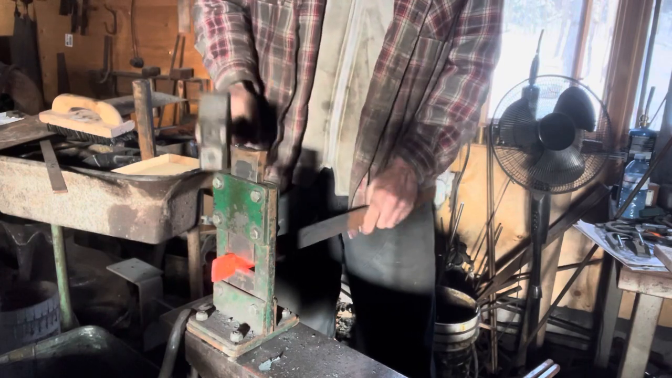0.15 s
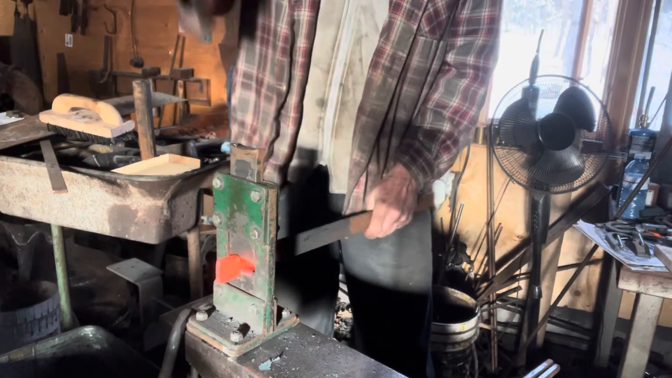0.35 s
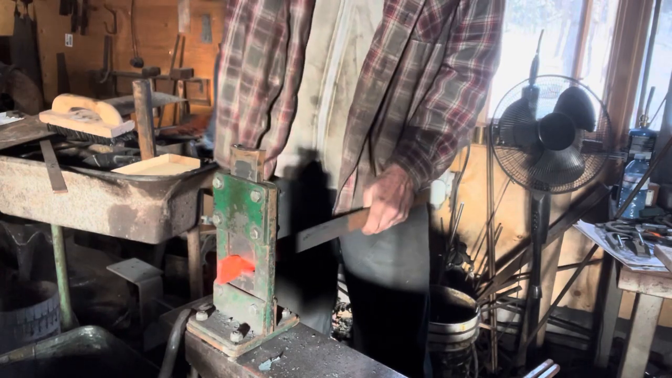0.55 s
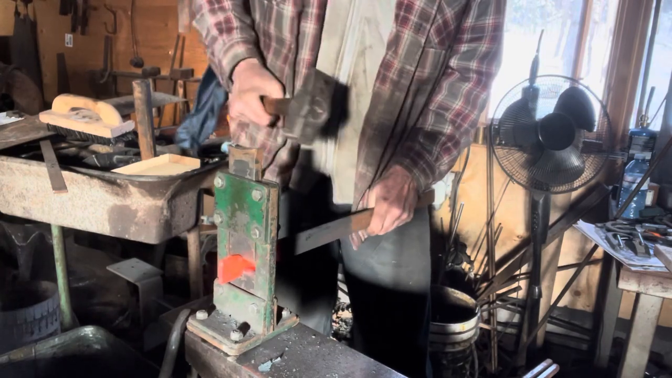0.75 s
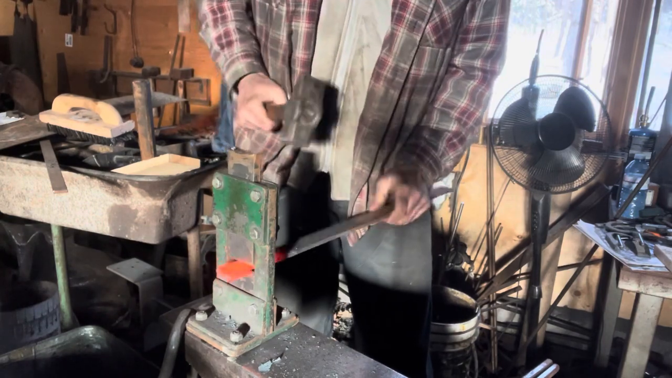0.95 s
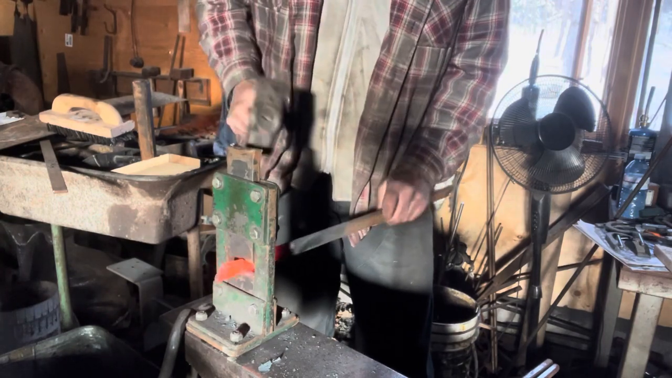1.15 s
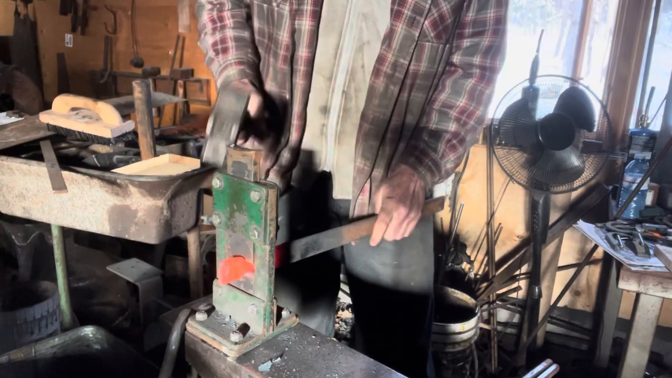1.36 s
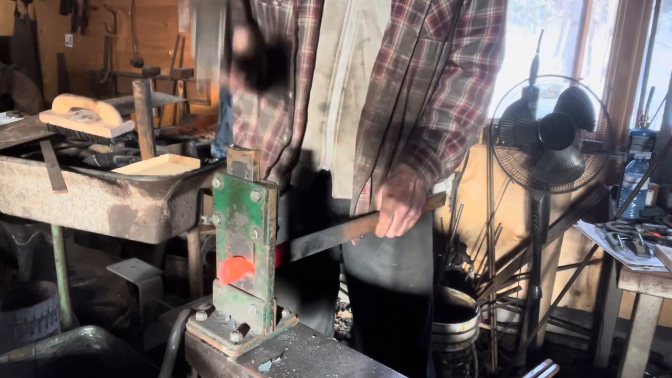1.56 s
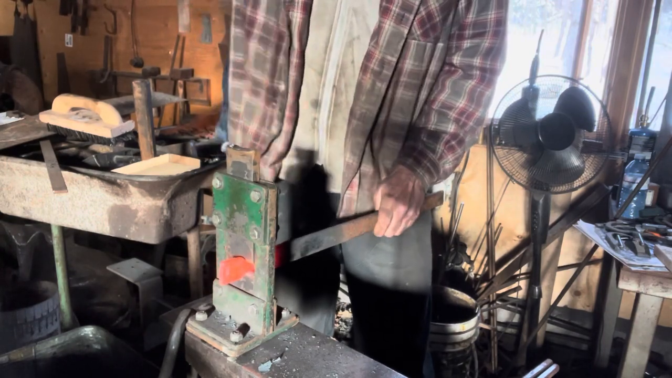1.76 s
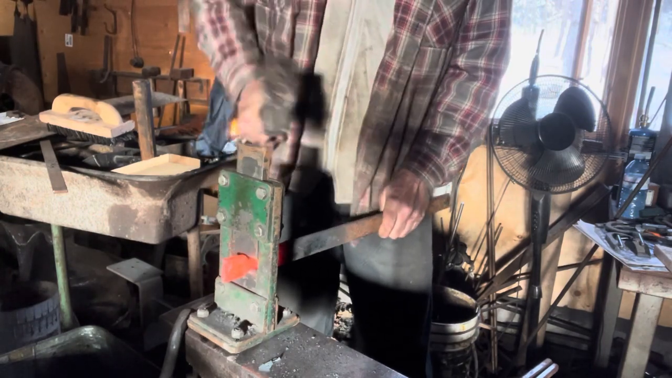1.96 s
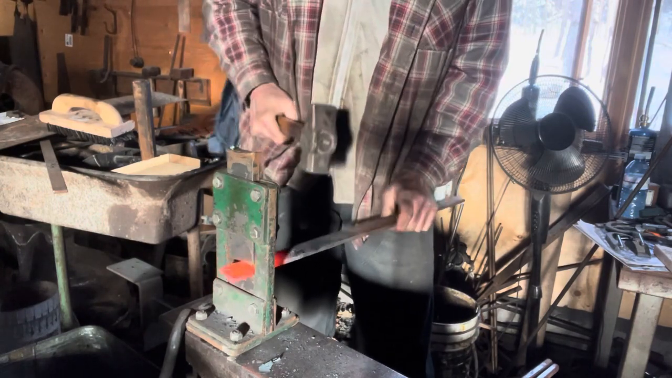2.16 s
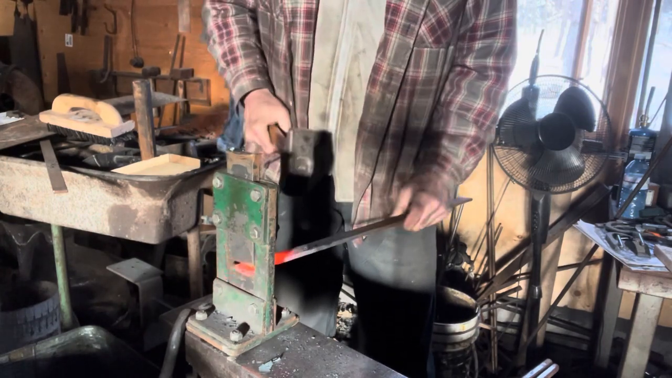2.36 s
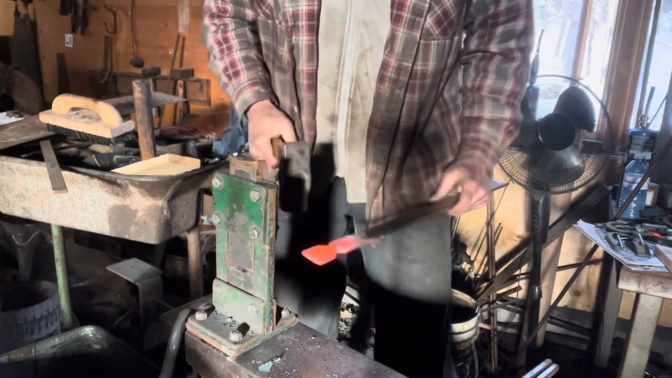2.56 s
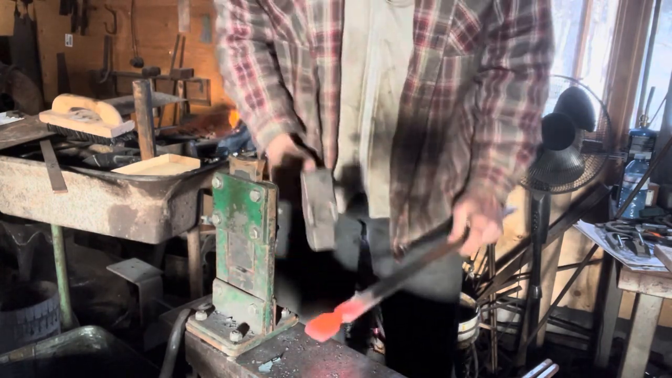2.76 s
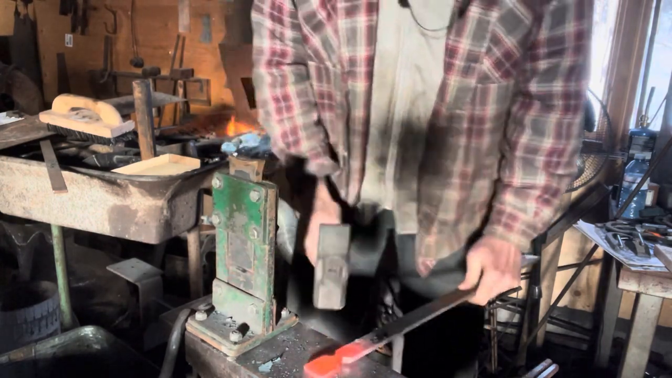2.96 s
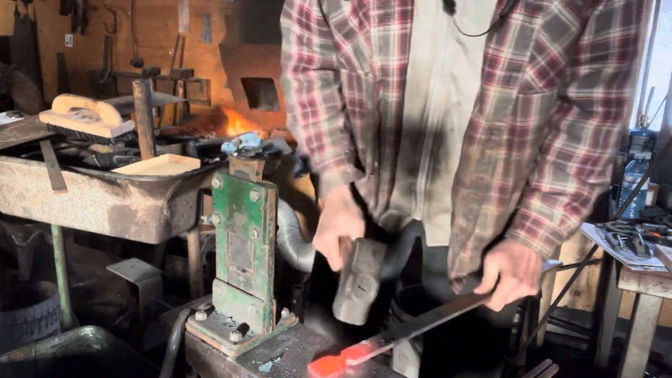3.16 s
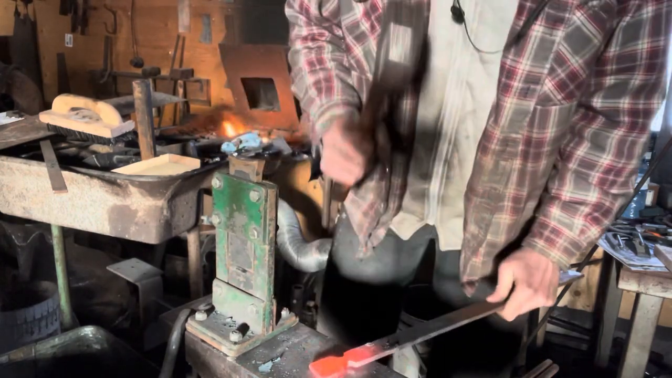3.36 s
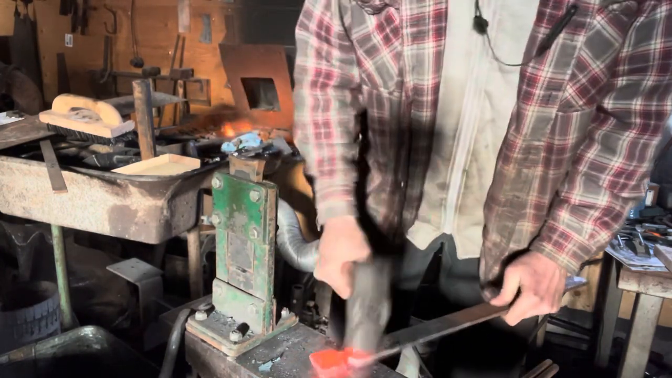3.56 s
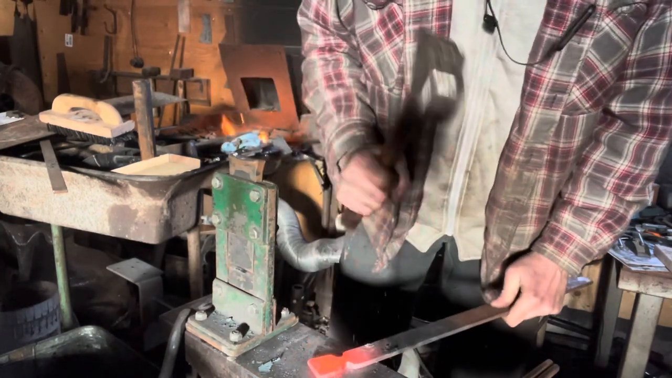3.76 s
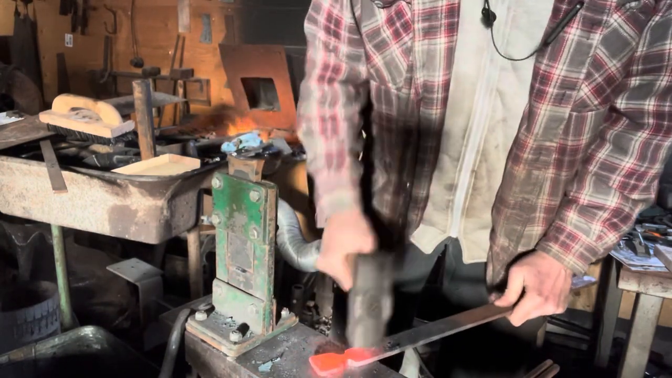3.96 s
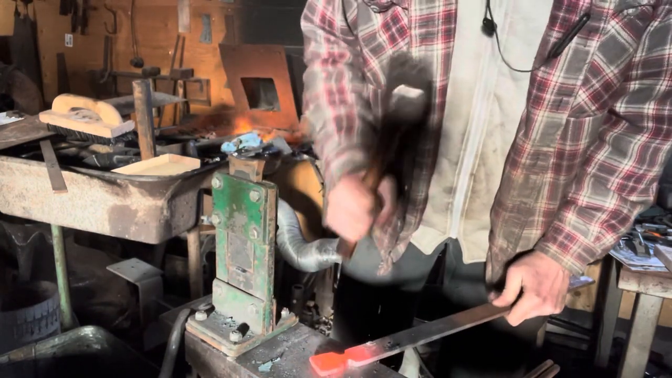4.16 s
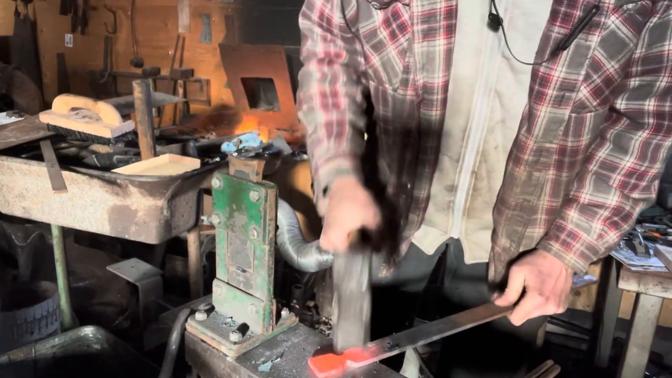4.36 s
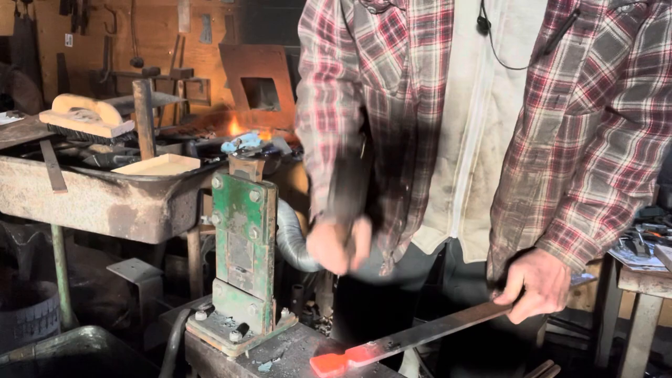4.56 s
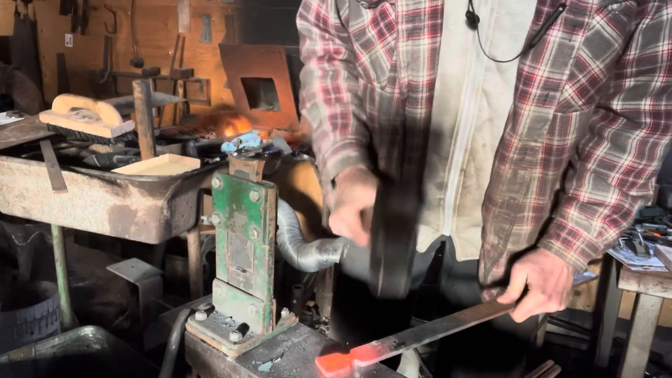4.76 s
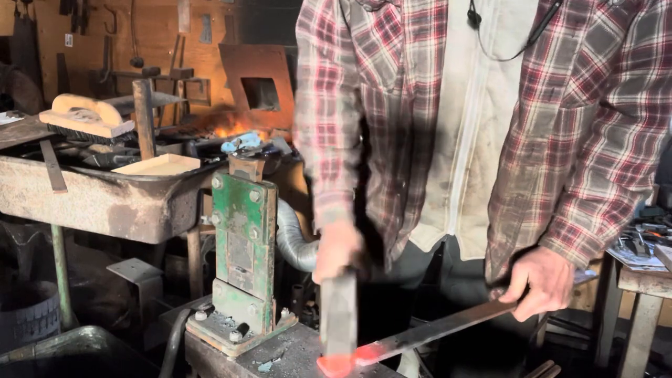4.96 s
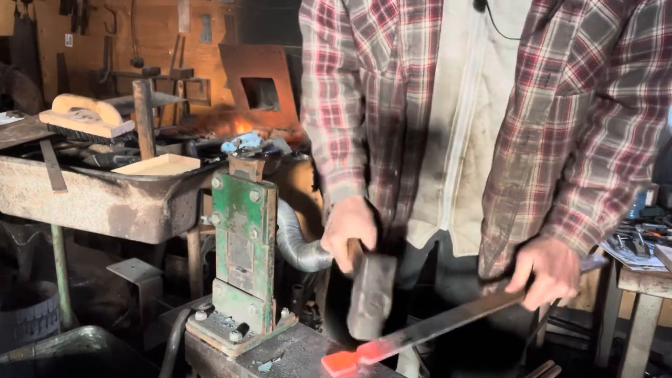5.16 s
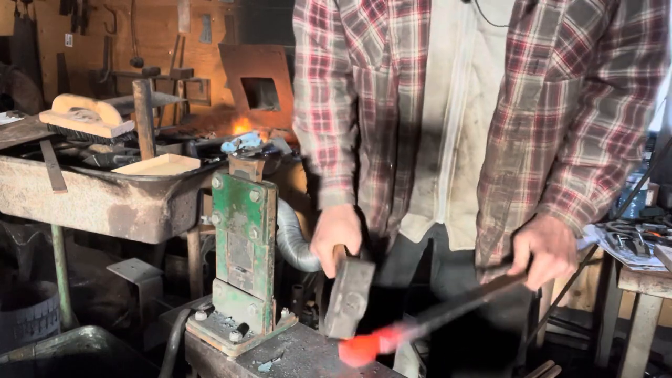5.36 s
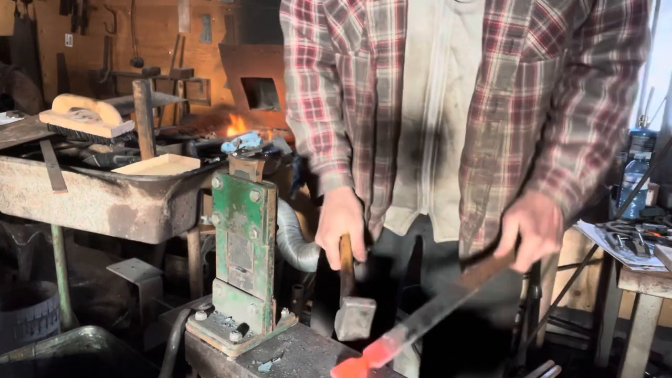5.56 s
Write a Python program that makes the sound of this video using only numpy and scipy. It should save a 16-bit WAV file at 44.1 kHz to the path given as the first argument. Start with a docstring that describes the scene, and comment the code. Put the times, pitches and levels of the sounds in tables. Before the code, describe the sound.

A small wooden forge, heard close in stereo, with a faint low blower hum and soft air rush throughout. In the first 0.35 s, the bar and hammer clink lightly on steel. A hard, sharp blow cracks on a forging tool at 0.65 s, followed by small scattered clinks until about 1.5 s; a second, fuller blow lands at 1.9 s. Around 2.3 s the bar scrapes out with a faint, growing rasp, then clinks more ringingly until 2.9 s. Two lighter, bright taps hit the bare anvil at 2.9 and 3.07 s. Five strong, regular blows strike the hot bar at 3.54, 3.92, 4.27, 4.61 and 4.96 s, each with a dense crack, low floor thud, short metallic ring and quick room echo. A thin high anvil note lingers after some. Two weak taps follow at 5.27 and 5.35 s, then a quick bright clatter near 5.4 s, fading out.

```python
"""In a small wooden shop, a smith hammers a hot steel bar while the forge blower hums behind.
Two blows land on a guillotine tool; then come light taps, five full blows on the bar over the anvil, and taps again.
Each blow is a burst of noise (crack), fading tones (ringing steel), a low push (floor) and an echo of fading noise.
Between blows the bar and hammer clink, made of short knocks and tones; once, the bar scrapes out of the tool."""
import sys
import numpy as np
from scipy import signal
from scipy.fft import rfft, irfft
from scipy.io import wavfile
from scipy.ndimage import uniform_filter1d

SR = 44100
rng = np.random.default_rng(int(sys.argv[2]) if len(sys.argv) > 2 else 0)


def to_wav(sig):
    """Store sig (one row per channel, or 1-D mono) as 16-bit WAV at the path in sys.argv[1].

    Samples outside -1..1 are clipped; the rate is SR.
    """
    pcm = np.clip(np.atleast_2d(sig), -1, 1) * 32767
    pcm = np.round(pcm).astype(np.int16)
    wavfile.write(sys.argv[1], SR, pcm.T)  # frames by channels


N = 251370
T = np.arange(N) / SR


def amp(db):
    """Turns decibels into a gain."""
    return 10 ** (np.asarray(db) / 20)


def unit(x):
    """Scales a sound to an average (rms) strength of 1."""
    return x / np.sqrt(np.mean(x ** 2) + 1e-20)


def read(points, hz):
    """Reads a table between its points, on a log-frequency axis."""
    f, value = np.transpose(points)
    return np.interp(np.log(hz + 1), np.log(f + 1), value)


def add(mix, s, sound):
    """Mixes a stereo sound in, starting at s seconds."""
    part = mix[:, round(s * SR):][:, :sound.shape[-1]]
    part += sound[..., :part.shape[1]]


def bins(size):
    """Lists the frequencies in the spectrum of this many samples."""
    return np.fft.rfftfreq(size, 1 / SR)


def noise(db, same, size):
    """Makes stereo noise of rms 1 with a given spectrum and left-right likeness."""
    left, other = rfft(rng.standard_normal((2, size)))
    same = np.clip(same, -1, 1)
    right = same * left + np.sqrt(1 - same ** 2) * other
    return unit(irfft(np.array([left, right]) * amp(db), size))


def ripple(hz, depth_db, spacing_hz):
    """Gives the uneven colour of many close, short-lived modes, in dB."""
    bumps = np.clip(rng.standard_normal(1024), -2, 2)
    return depth_db * np.interp(hz / spacing_hz, np.arange(1024), bumps)


def treble_tilt(tilt_db, hz):
    """Raises or lowers the treble by tilt_db for each octave above 3000 Hz."""
    return tilt_db * np.log2(np.maximum(hz / 3000, 1))


# how strongly reflections make a ringing mode swell and sag, and how often they change (per s)
FLUTTER, FLUTTER_HZ = .65, 45


def ring(modes, size, flutter=FLUTTER):
    """Rings steel as dying tones; reflections make each swell and sag differently at left and right."""
    out, t = np.zeros((2, size)), T[:size]
    at = np.arange(256) / FLUTTER_HZ
    for hz, db, t60 in modes:
        u = t[:int(min(2 * t60 * SR, size))]
        knots = rng.standard_normal((2, 2, 256))
        start = rng.uniform(0, 2 * np.pi)
        apart = rng.choice([-1, 1]) * rng.uniform(0.073, 2.7)  # left-right phase, radians
        tone = amp(db - 60 * u / t60) * np.exp(1j * (2 * np.pi * hz * u + start))
        for side, (re, im) in enumerate(knots):
            echoes = flutter * (re + 1j * im) * np.exp(-at)
            direct = np.exp(1j * side * apart)
            out[side, :len(u)] += (tone * np.interp(u, at, direct + echoes)).real
    return out * (1 - np.exp(-t / 0.00059))


# left-right likeness of spread-out sound: (frequency [Hz], likeness [-1 to 1])
LIKENESS = [(60, 1), (130, 0.84), (290, 0.59), (640, -0.12), (1400, 0.22), (7000, 0.33), (15000, -0.9)]
# colour of the blower's rush of air, before the low cut: (frequency [Hz], relative level [dB per Hz])
AIR_COLOUR = [(15, -30.5), (25, -25.5), (68, -11.5), (108, -16.5), (212, -22.5), (427, -20), (545, -24),
              (1400, -31), (2280, -43), (2480, -34), (3080, -46.5), (7510, -50), (10700, -75), (13600, -70),
              (16000, -72)]
# steady notes of the blower, before they waver: (frequency [Hz], level [dB rms])
HUM_NOTES = [(53.8, -50.5), (355, -80.5), (414.5, -71)]
AIR_DB = -60  # level of the rush above 100 Hz


def blower(waver=0.056, low_hz=48):
    """The forge blower: a low, gently wavering hum of pure tones over a soft rush of noise."""
    hz = bins(N)
    low_cut_db = 10 * np.log10(1 + (low_hz / (hz + 1)) ** 8)
    rush = noise(read(AIR_COLOUR, hz) - low_cut_db, read(LIKENESS, hz), N)
    rush /= np.std(irfft(rfft(rush) * (hz > 100), N))
    sway = 1 + waver * np.interp(T, np.linspace(0, T[-1], 40), rng.standard_normal(40))
    hum = sum(amp(db) * np.sqrt(2) * np.sin(2 * np.pi * (f * T + rng.random()))
              for f, db in HUM_NOTES)
    return amp(AIR_DB) * rush + hum * sway


# how long the shop's echo takes to fade by 60 dB: (frequency [Hz], fade time [s])
SHOP_FADE = [(100, 0.65), (260, 0.47), (700, 0.45), (1840, 0.44), (4850, .33), (9000, 0.29), (13000, 0.067)]


def shop(db, rise=0.0013, size=32768):
    """The room's answer to one knock: sound from all around whose treble dies first."""
    hz, t, z = signal.stft(noise(db, read(LIKENESS, bins(size)), size), SR, nperseg=256)
    fading = z * amp(-60 * t / read(SHOP_FADE, hz)[:, None])
    tail = signal.istft(fading, SR, nperseg=256)[1][:, :size]
    return tail * (1 - np.exp(-T[:size] / rise))


def scrape(start=2.27, db=-60, grain_db=4, size=7000):
    """The bar slides out of the tool: its scale rasps as grainy noise that grows louder."""
    out, hz = np.zeros((2, N)), bins(size)
    grains = amp(grain_db * unit(uniform_filter1d(rng.standard_normal(size), size=200)))
    colour = [(300, -25), (1500, 7), (3500, 1.0), (9000, -3), (11000, -20), (15000, -15)]
    rasp = noise(read(colour, hz), 0, size)
    add(out, start, amp(db) * rasp * grains * np.linspace(0, 1, size))
    return out


KNOCK_T60_S = 0.032  # time for a knock to fade by 60 dB
# clinks before LONGER_RING_S ring shorter, later ones longer: factors on the bar's ring time
LONGER_RING_S, SHORTER, LONGER = 2.7, 0.56, 1.65
# steel knocking on steel:
# (time [s], level [dB], brightest frequency [Hz], bar ring relative to the knock [dB])
CLINKS_HEARD = [(.047, -42, 3240, -3.5), (.107, -43.5, 2400, -23), (.205, -29, 4585, -3.5),
                (.239, -41, 5600, -3), (.306, -33.5, 4250, 4.5), (.323, -33, 3680, -2),
                (.862, -30.5, 3830, 0.5), (0.973, -35.5, 3500, -17), (1.043, -48, 2970, 4),
                (1.101, -43, 2650, -7), (1.19, -37.5, 4230, 2), (1.286, -48.5, 4120, 2.5),
                (1.434, -59.5, 2920, 2.5), (1.47, -53.5, 2840, -3.5), (2.182, -42, 3400, 0.5),
                (2.428, -27, 4440, 2), (2.478, -33.5, 4670, 0), (2.518, -48.5, 4600, 7),
                (2.727, -47.5, 787, -25), (2.835, -27.5, 5676, -9.5), (2.879, -34, 6000, -2),
                (5.3844, -19, 6800, -25), (5.393, -20.5, 6140, -26), (5.428, -29, 6460, -19),
                (5.455, -32.5, 5220, -12), (5.522, -42, 1770, -21)]
# notes of the gripped bar: (frequency [Hz], relative level [dB], 60 dB fade time before the factor [s])
BAR_NOTES = [(1530, -16, .16), (1640, -11, .13), (2370, -13, .2), (2505, -12, .17), (2660, -17, .25),
             (3060, -15, .14), (3370, -12, .17), (4585, -9, .11), (4578, -22, .4), (5100, -11, .08),
             (6480, -18, .1), (8552, -24, .18)]


def clinks(room_db=-16, below_db=5, above_db=9, same=0.15, size=32768):
    """The bar and hammer knock lightly on tool and anvil; the bar rings longer in the later clinks."""
    out, hz, t = np.zeros((2, N)), bins(size), T[:size]
    tint = [(100, 6.0), (500, 6), (8800, -3.5), (11000, -19.5), (15000, -5.0)]
    for s, db, centre_hz, bar_db in CLINKS_HEARD:
        octaves = np.log2((hz + 1) / centre_hz)
        colour = -below_db * np.maximum(-octaves, 0) - above_db * np.maximum(octaves, 0) ** 2
        colour = colour + read(tint, hz) + ripple(hz, depth_db=8.5, spacing_hz=136.0)
        knock = noise(colour, same, size) * amp(-60 * t / KNOCK_T60_S) * (1 - np.exp(-t / 0.00039))
        length = SHORTER if s < LONGER_RING_S else LONGER
        bar = ring([(f, level, length * decay) for f, level, decay in BAR_NOTES], size)
        add(out, s, amp(db) * (knock + amp(room_db) * shop(colour) + amp(bar_db) * bar))
    return out


# colour of the push into the floor: (frequency [Hz], relative level [dB])
THUD_COLOUR = [(40, -14.5), (90, -5), (170, 7.5), (230, 0.5), (310, -12), (480, 4), (700, -2), (1050, -4.5),
               (1500, -22), (3000, -63), (6000, -110)]
# booming floor and walls:
# (frequency before a small random shift [Hz], relative level [dB], 60 dB fade time [s], swell time [s])
BOARD_NOTES = [(47.07, -17.5, 0.63, 0.22), (69.2, -32.5, .7, 0.045), (98, -42, 0.57, 0.0024),
               (148, -50.5, 0.49, 0.012), (173, -43, 0.54, 0.0067)]


def thud(db=-19.0, lag=.0025, lag_cycles=1.902, size=32768):
    """A push through stand and floor, its low notes arriving last; the boards swell and boom."""
    hz, t = bins(size), T[:size]
    delay = lag + lag_cycles / np.maximum(hz, 30)
    late = np.exp(-2j * np.pi * np.cumsum(delay) * hz[1])
    push = irfft(amp(read(THUD_COLOUR, hz)) * late, size)
    boom = np.zeros(size)
    for f, level, t60, swell in BOARD_NOTES:
        loudness = amp(level - 60 * t / t60) * (1 - np.exp(-(t / swell) ** 2))
        boom += loudness * np.sin(2 * np.pi * f * rng.uniform(0.94, 1.01) * t)
    fade = np.minimum(2 * (1 - t / t[-1]), 1)
    sides = amp([[1], [-1]])  # left 1 dB up, right 1 dB down
    return (amp(db) * push / abs(push).max() + boom) * fade * sides


# colour of steel meeting steel, before tilt and ripple: (frequency [Hz], relative level [dB per Hz])
CRACK_COLOUR = [(200, -20.5), (500, -2), (1000, -4.5), (1300, -4.5), (1800, -9.5), (2600, -4), (4200, 3),
                (6000, -2.5), (8000, -3.5), (9800, -9.5), (11300, -33.5), (13000, -10.5), (15200, -9.5),
                (16500, -37.5)]


def crack(tilt_db, hold, t60=0.023, chatter_db=-14, chatter_t60=0.11, same=0.069, size=8192):
    """Steel meets steel: a spike, a few ms of dense ringing, then weaker chatter of the loose parts."""
    hz, t = bins(size), T[:size]
    colour = read(CRACK_COLOUR, hz) + treble_tilt(tilt_db, hz)
    colour = colour + ripple(hz, depth_db=2.5, spacing_hz=216.0)
    dense = amp(-60 * np.maximum(t - hold, 0) / t60)
    chatter = amp(chatter_db - 60 * t / chatter_t60)
    contact = (1 - np.exp(-t / .0002)) * (1 + .7 * np.exp(-t / .0012))
    return noise(colour, same, size) * (dense + chatter) * contact


# harder blows are brighter: each dB of force above FULL_FORCE_DB tilts the treble up (dB per octave)
FULL_FORCE_DB, TILT_PER_DB = -12, 1.33
ROOM_TILT = .4  # share of that tilt that the room's answer keeps
SHARP_CONTACT_S = 0.0011  # a longer contact spreads the same energy into a lower crack
# floor and room relative to the force; the anvil's face relative to the louder of the anvil and hammer rings
THUD_DB, ROOM_DB, FACE_DB = 11.5, -11, 0
# where the hammer lands sets how freely the steel rings: this many dB per dB of long note above usual
USUAL_NOTE_DB, RING_PER_DB = -60, 0.13
# hammer blows:
# (time [s], force [dB], contact length [s], level of the anvil's long note [dB], what is struck)
HAMMER_BLOWS = [(0.6494, -13, 0.00096, -46.5, "tool"), (1.9022, -10, 0.0044, -58.5, "tool"),
                (2.8928, -17, 0.0061, -61.5, "bare anvil"), (3.0692, -21, 0.0056, -50.5, "bare anvil"),
                (3.5407, -9, 0.0041, -71.5, "hot bar"), (3.9189, -10, 0.0043, -51.5, "hot bar"),
                (4.2657, -10.5, 0.0012, -71.5, "hot bar"), (4.6106, -11, 0.0055, -52.5, "hot bar"),
                (4.9605, -10.5, 0.002, -53.5, "hot bar"), (5.266, -28.5, 0.0053, -73, "bare anvil"),
                (5.347, -32.5, 0.0084, -82, "bare anvil")]
# how each struck thing shares out the force, relative to it:
# (crack [dB], clunk [dB], tool ring [dB], anvil ring [dB], hammer ring [dB])
SHARES = {"tool": (0, -22, 12, -12.5, -18), "hot bar": (0, -8, -13, 9.5, -6.5),
          "bare anvil": (4.5, -2, -15, -3, 18.5)}
# colour of the room's answer, before tilt and ripple: (frequency [Hz], relative level [dB per Hz])
ECHO_COLOUR = [(25, -43.5), (80, -1), (180, -1.5), (300, -6.5), (450, -2.5), (750, -0.5), (1200, -3.5),
               (1700, 2), (2800, 0.5), (4500, -1), (7000, -5.5), (9500, -6.5), (11200, -30), (13000, -13.5),
               (15200, -9.5), (16500, -50)]
# All the notes below: (frequency [Hz], relative level [dB], time to fade by 60 dB [s]) # the short, dull clunk
# of the hammer's body knocking on the anvil
CLUNK_NOTES = [(577, -11.5, 0.066), (994, -11, 0.13), (1051.5, -9.5, 0.054), (1490, -17, 0.1)]
# the guillotine tool
TOOL_NOTES = [(420, -42, .5), (468, -41, .5), (1526, -31, .35), (1685, -33, .3), (2361, -43, .4),
              (2433, -38, .25), (4576, -27, .16), (4583, -42, .4), (5278, -46, .44), (7725, -48, .33),
              (8538, -45, .3), (9469, -44, .32), (9607, -46, .3), (12134, -43, .5)]
# the anvil under the hot bar
ANVIL_NOTES = [(420, -44, 0.55), (468, -44, 0.55), (719, -45, 0.51), (921, -42, 0.44), (1521, -27, 0.43),
               (1677, -37, 0.45), (1820, -41, 0.45), (2046, -42, 0.44), (2401, -38, 0.54),
               (2579, -35, 0.42), (2929, -36, 0.46), (3001, -37, 0.45), (3074, -31, 0.43),
               (3171, -31, 0.41), (3782, -39, 0.39), (3879, -31, 0.39), (4274, -39, 0.37),
               (5634, -42, 0.36), (6072, -45, 0.34), (6568, -41, 0.32), (7596, -44, 0.32),
               (7843, -43, 0.32), (8193, -42, 0.29), (8282, -41, 0.29), (9973, -47, 0.3),
               (12174, -42, 0.34)]
# the bare hammer on the anvil
HAMMER_NOTES = [(468, -47, 0.46), (840, -44, 0.36), (1050, -40, 0.39), (1470, -40, 0.37), (2934, -23, 0.28),
                (3007, -28, 0.3), (3173, -34, 0.39), (3572, -34, 0.35), (3881, -33, 0.33),
                (3954, -35, 0.33), (4264, -33, 0.3), (4896, -40, 0.31), (5496, -43, 0.37),
                (5631, -44, 0.37), (6433, -50, 0.28), (6856, -46, 0.26), (7615, -51, 0.29),
                (7843, -52, 0.27), (12150, -49, 0.29), (13000, -50, 0.15), (14850, -40, 0.17)]
# the anvil's face, woken by every blow
FACE_NOTES = [(5631, -65, 1.1), (3892, -46, .45), (1065, -36, .14), (1470, -35, .22), (1703, -35, .28),
              (2557, -34, .25), (4560, -40, .22), (6627, -40, .2)]
# the anvil's long note, a close pair that beats slowly
LONG_NOTE_PAIR = [(2433, 0, 2.6), (2437, -9, 2.2)]


def blows():
    """Each blow cracks, thuds, clunks, rings the steel and fills the room; force drives them together."""
    out, hz = np.zeros((2, N)), bins(size=32768)
    colour = read(ECHO_COLOUR, hz) + ripple(hz, depth_db=2.4, spacing_hz=70) * np.minimum(hz / 1500, 1)
    ends = [row[0] for row in HAMMER_BLOWS[1:]] + [N / SR]
    for (s, force_db, contact_s, note_db, struck), end in zip(HAMMER_BLOWS, ends):
        crack_db, clunk_db, tool_db, anvil_db, hammer_db = SHARES[struck]
        ring_db = force_db + RING_PER_DB * (note_db - USUAL_NOTE_DB)
        tilt_db = TILT_PER_DB * (force_db - FULL_FORCE_DB)
        sharpness = np.sqrt(SHARP_CONTACT_S / contact_s)
        add(out, s, amp(force_db + crack_db) * sharpness * crack(tilt_db, contact_s))
        add(out, s, amp(force_db + THUD_DB) * thud())
        add(out, s, amp(force_db + clunk_db) * ring(CLUNK_NOTES, size=8192))
        add(out, s, amp(force_db + ROOM_DB) * shop(colour + treble_tilt(ROOM_TILT * tilt_db, hz)))
        face_db = FACE_DB + max(anvil_db, hammer_db)
        for modes, share_db in ((TOOL_NOTES, tool_db), (ANVIL_NOTES, anvil_db),
                                (HAMMER_NOTES, hammer_db), (FACE_NOTES, face_db)):
            add(out, s, amp(ring_db + share_db) * ring(modes, size=SR))
        # the anvil's long note sings on until the next blow stops it
        add(out, s, amp(note_db) * ring(LONG_NOTE_PAIR, round((end - s) * SR), flutter=0.27))
    return out


def scene():
    """Mixes the blower, the scrape, the clinks and the blows."""
    return blower() + scrape() + clinks() + blows()


EDGE_HZ = 16300  # upper limit of the sound


def record(dry, ceiling=1.0, threshold_db=-27, squeeze=0.14, recovery_db=11):
    """Gain control dips just after each loud blow and creeps back; peaks are rounded, treble cut off."""
    power_db = 10 * np.log10(abs(uniform_filter1d((dry ** 2).mean(0), size=400)) + 1e-12)
    fall = T * recovery_db  # recovery in dB per second
    duck_db = np.maximum.accumulate(squeeze * (power_db - threshold_db) + fall) - fall
    duck_db = np.maximum(duck_db, 0)
    lag = np.exp(-1 / (0.09 * SR))  # the gain follows with a 0.09 s lag
    gain = amp(-signal.lfilter([1 - lag], [1, -lag], duck_db))
    rounded = ceiling * np.tanh(dry * gain / ceiling)
    band_limit = signal.firwin(511, EDGE_HZ, window=("kaiser", 9), fs=SR)
    return signal.oaconvolve(rounded, band_limit[None], "same")


dry = scene()
out = record(dry)
to_wav(out)
```